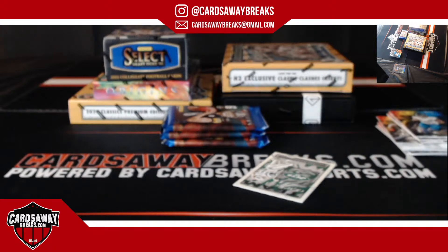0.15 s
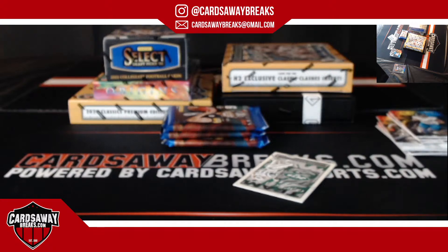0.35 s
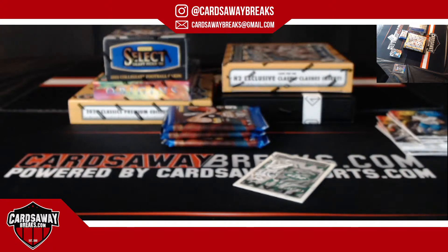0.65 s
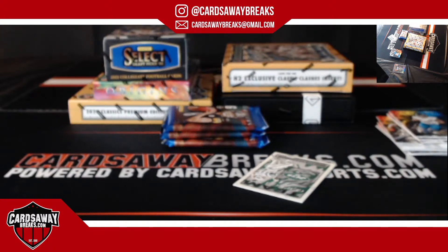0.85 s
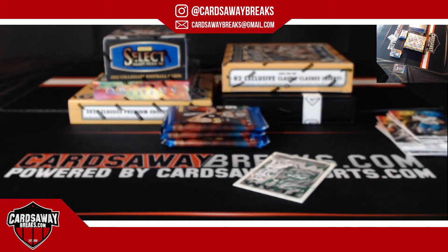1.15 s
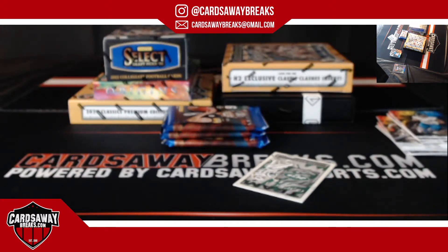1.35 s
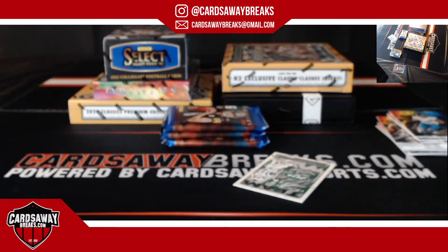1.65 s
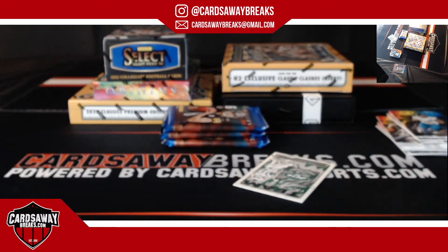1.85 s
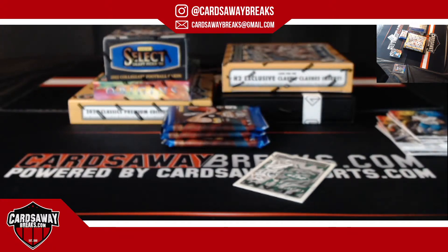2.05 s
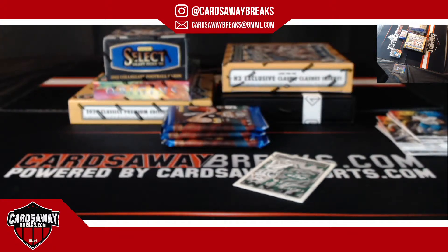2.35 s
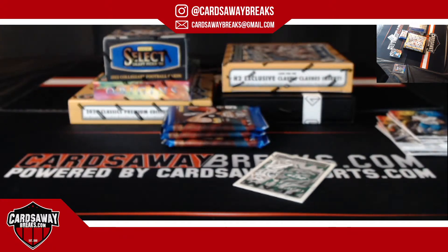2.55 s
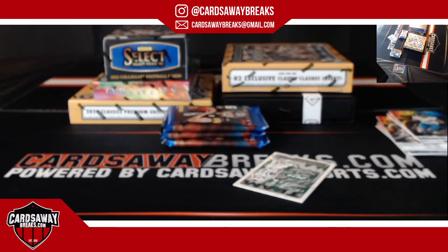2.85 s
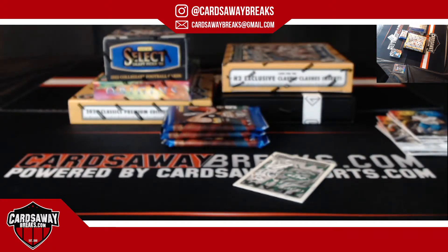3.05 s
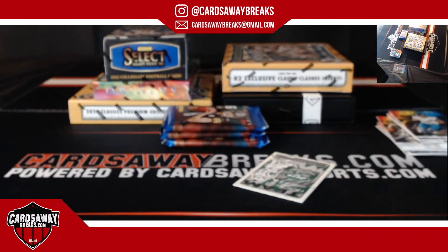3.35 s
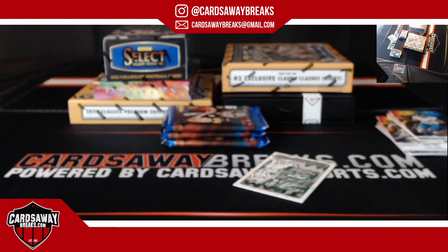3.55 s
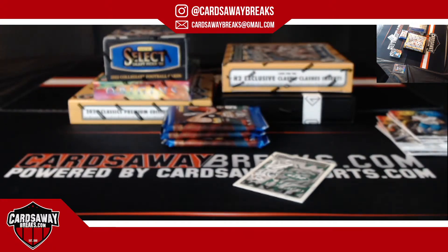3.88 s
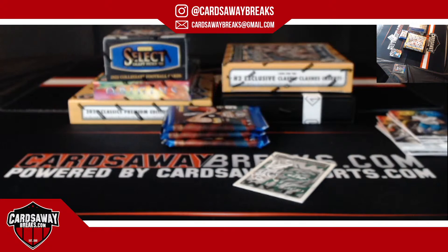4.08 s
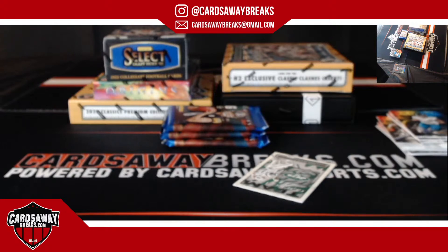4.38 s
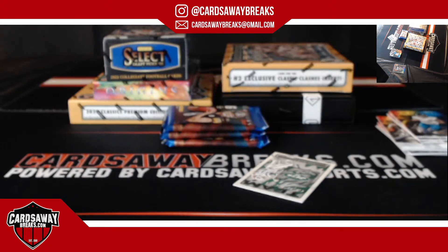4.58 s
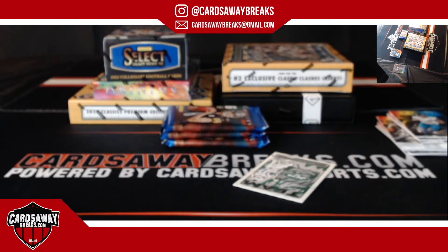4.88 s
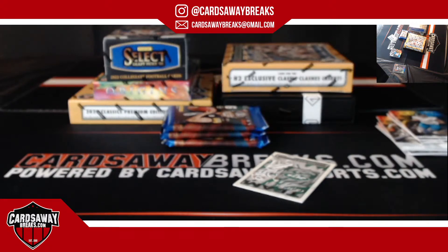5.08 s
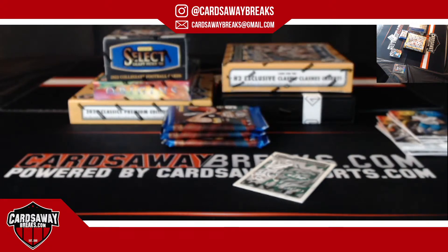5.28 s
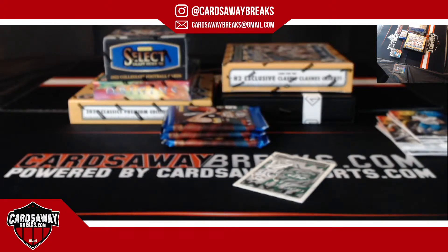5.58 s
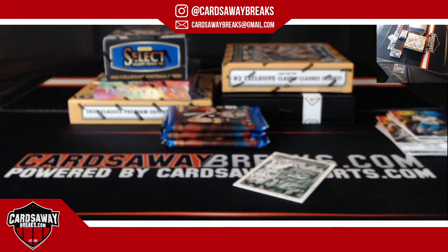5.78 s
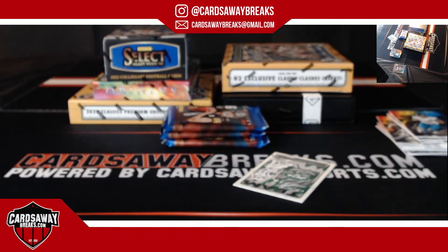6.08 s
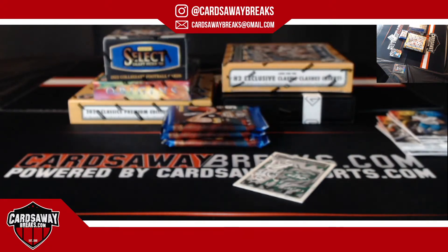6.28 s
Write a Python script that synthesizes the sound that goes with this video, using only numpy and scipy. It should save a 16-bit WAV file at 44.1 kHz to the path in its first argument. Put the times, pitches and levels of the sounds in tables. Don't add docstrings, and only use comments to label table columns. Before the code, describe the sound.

Close, dry tabletop sounds over a quiet low room hum. Faint plastic rubbing and small ticks come first, with a soft knock near half a second, then a short scraping pull of card from sleeve. Crisp snaps and clicks peak at 2.3 and 3.3 seconds, with thin rustling between. One hard flat slap, by far the loudest event, rings the table briefly late on, followed by a short creak and a muffled low bump.

```python
import sys
import numpy as np
from scipy import signal
from scipy.fft import rfft, irfft, next_fast_len
from scipy.io import wavfile
from scipy.ndimage import uniform_filter1d, map_coordinates

SR = 44100
rng = np.random.default_rng(int(sys.argv[2]) if len(sys.argv) > 2 else 0)


def wav_record(signal):
    frames = np.transpose(np.atleast_2d(signal))
    bounded = np.clip(frames, -1, 1)
    quanta = np.round(bounded * 32767).astype(np.int16)
    wavfile.write(sys.argv[1], SR, quanta)


def voltage_ratio(level):
    return 10 ** (np.asarray(level, float) / 20)


N = 283547


def unit(x):
    return x / np.sqrt(np.mean(x ** 2) + 1e-20)


def top(x):
    return x / np.abs(x).max()


def sine(hz, t):
    return np.sin(2 * np.pi * hz * t)


def along(points, hz):
    f, v = np.transpose(points)
    return np.interp(np.log(hz + 1), np.log(f + 1), v)


def wobble(rate_hz):
    knots = rng.standard_normal(int(N * rate_hz / SR) + 4)
    return map_coordinates(knots, [np.arange(N) * rate_hz / SR])


def filtered(x, response):
    m = next_fast_len(len(x) + 8192)
    return irfft(rfft(x, m) * response(np.fft.rfftfreq(m, 1 / SR)), m)[:len(x)]


def peak(f, hz, width_hz):
    return 1j * f * width_hz / (hz * hz - f * f + 1j * f * width_hz)


def band(f, lo_hz, hi_hz):
    rise = (1j * f / (lo_hz + 1j * f)) ** 2
    return rise / (1 - (f / hi_hz) ** 2 + 1.3j * f / hi_hz)


def gloss(f):
    return band(f, 6500, 12800) * peak(f, 11000, 7000) ** 2


def stroke_curves(rows, edge_s):
    t = np.arange(N) / SR
    gate = np.clip(np.minimum(t - rows[0][0], rows[-1][0] - t) / edge_s, 0, 1)
    s, *cols = np.transpose(rows)
    return gate, [np.interp(t, s, c) for c in cols]


def friction(grain_db, patchy_db):
    catches = rng.standard_normal(N) * voltage_ratio(grain_db * wobble(820))
    z = signal.stft(catches, nperseg=256)[2]
    field = uniform_filter1d(rng.standard_normal(z.shape), 5, 0)
    field = uniform_filter1d(field, 5, 1)
    return signal.istft(z * voltage_ratio(patchy_db * unit(field)), nperseg=256)[1][:N]


def decaying(t60_points, colour, seconds):
    hz, t, z = signal.stft(rng.standard_normal(round(seconds * SR)), SR, nperseg=256)
    decay = voltage_ratio(-60 * t / along(t60_points, hz)[:, None])
    return signal.istft(z * colour(hz)[:, None] * decay, SR, nperseg=256)[1]


def add(track, s, x):
    part = track[round(s * SR):][:len(x)]
    part += x[:len(part)]


# f/Hz, density/dB per Hz
AIR_COLOUR = [(11, -30.5), (18, 0), (97, -7), (148, -18.5), (166, -16.5), (203, -10.5), (320, -18),
              (519, -22.5), (599, -24.5), (1030, -32), (1670, -37.5), (1980, -36), (2160, -40.5),
              (2560, -39), (16300, -51.5)]
# f/Hz, level/dB
HUM_TONES = [(140.0, -79), (204.6, -82), (1001, -93), (1916, -102), (2003, -101), (4000, -106)]
AIR_DB = -65


def air():
    noise = unit(filtered(rng.standard_normal(N), lambda f: voltage_ratio(along(AIR_COLOUR, f))))
    rumble = filtered(noise, lambda f: 1 / (1 + (f / 300) ** 2))
    noise = noise + rumble * (voltage_ratio(1.0 * wobble(4.0) + 0.83 * wobble(0.37)) - 1)
    t = np.arange(N) / SR
    tones = np.zeros(N)
    for hz, db in HUM_TONES:
        level = voltage_ratio(db + 1 + 1.2 * wobble(5.6))
        tones += level * np.sin(2 * np.pi * hz * t + .8 * wobble(4.6))
    return voltage_ratio(AIR_DB) * noise + tones


# f/Hz, t60/s
ROOM_DECAY = [(200, .3), (1000, 0.32), (4000, 0.085), (12000, 0.14)]


def room(x):
    out, hop = np.zeros(N), SR // 3
    for start in range(0, N, hop):
        tail = decaying(ROOM_DECAY, np.ones_like, 0.41)
        tail = tail / np.linalg.norm(tail)
        add(out, start / SR + 0.0027, signal.fftconvolve(x[start:start + hop], tail))
    return out


# t/s, push level/dB, push f/Hz, panel ring level/dB
BUMP_EVENTS = [(.4778, -43, 113, -51.5), (.537, -53, 107, -61), (2.324, -49.5, 42, -74),
               (.4783, -58, 740, -90), (.5425, -55, 500, -90), (2.0375, -58, 540, -90),
               (1.9, -51, 750, -90), (5.3, -54, 600, -80), (3.3105, -51, 1000, -90), (.5145, -57, 710, -88),
               (2.7, -51.5, 600, -89.5), (2.201, -56, 590, -90), (2.8, -54.5, 680, -90),
               (3.261, -42, 520, -69), (4.681, -53, 51, -60.5), (6.21, -62, 85, -55),
               (6.274, -44.5, 54.8, -39.5), (6.304, -51, 37, -46.5)]


def bumps():
    out, t = np.zeros(N), np.arange(SR // 8) / SR
    panel = sine(215, t) + .25 * sine(410, t)
    for s, push_db, hz, ring_db in BUMP_EVENTS:
        push = sine(hz, t) * hz * t * np.exp(-2.6 * hz * t) * 7
        ring = voltage_ratio(ring_db - 60 * t / 0.07) * (1 - np.exp(-t / 0.0045)) * panel
        add(out, s, voltage_ratio(push_db) * push + ring)
    return out


# t/s, f/Hz, level/dB
SQUEAK_PATH = [(4.99, 14500, -100), (5.013, 13900, -94), (5.035, 14700, -92), (5.055, 14900, -91),
               (5.09, 14600, -93), (5.115, 14150, -96)]


def squeak():
    gate, (hz, db) = stroke_curves(SQUEAK_PATH, edge_s=0.011)
    level = voltage_ratio(db + 3 + 3.9 * wobble(60))
    return gate * level * np.sin(2 * np.pi * np.cumsum(hz + 60 * wobble(150)) / SR)


# t/s, pressure/dB
CREAK_PRESSURE = [
    (5.5, -92),
    (5.545, -80),
    (5.556, -67.5),
    (5.572, -83),
    (5.595, -64),
    (5.616, -72),
    (5.632, -68),
    (5.642, -80),
    (5.65, -90),
]
# f/Hz, width/Hz, level/dB
CREAK_MODES = [(5900, 960, 2), (8500, 1500, -7), (11640, 1200, -12)]
CREAK_TABLE_DB, TABLE_GROWS = -69.5, 0.081
SLIPS_PER_S = 140


def creak():
    gate, (plastic_db,) = stroke_curves(CREAK_PRESSURE, edge_s=0.0043)
    phase = np.cumsum(SLIPS_PER_S * voltage_ratio(1.7 * wobble(70))) / SR % 1
    table_slips = (.4 + np.exp(-7 * phase)) * rng.standard_normal(N)
    plastic_slips = (.35 + np.exp(-4 * phase)) * rng.standard_normal(N)

    def plastic_response(f):
        return sum(voltage_ratio(db) * peak(f, hz, width) for hz, width, db in CREAK_MODES) * band(f, 3500, 14000)

    table = unit(filtered(table_slips, lambda f: band(f, 350, 2700) * band(f, 200, 4260)))
    plastic = unit(filtered(plastic_slips, plastic_response))
    table_db = CREAK_TABLE_DB + TABLE_GROWS * (plastic_db + 72)
    return gate * (voltage_ratio(table_db) * table + voltage_ratio(plastic_db) * plastic)


# t/s, peak level/dB, ring f/Hz, sheen/dB
SNAP_EVENTS = [(0.528, -60, 5520, -22), (2.088, -57, 5890, -10), (2.0927, -47.5, 1500, -12),
               (2.2642, -54.5, 2260, -19), (3.2328, -68, 5750, -25), (3.3045, -50, 5800, -22),
               (3.5583, -53.5, 5650, -15), (4.633, -61, 4550, 3), (4.853, -59, 3000, -22),
               (5.0389, -57, 3800, -31), (5.7815, -61, 4620, -23)]
# t/s, peak level/dB, ring f/Hz
FLEX_EVENTS = [(3.254, -45, 6600), (3.2603, -38.5, 5100), (3.3111, -43, 4530), (5.5204, -56.5, 2980)]
# t/s, peak level/dB, ring f/Hz
TICK_EVENTS = [(0.1434, -65, 2000), (.4453, -64, 5860), (.4715, -58, 4500), (.4885, -62, 3700),
               (.509, -56, 5000), (.521, -71, 5500), (0.7646, -69, 9150), (0.777, -74, 2450),
               (2.0284, -71, 2390), (2.029, -66, 9500), (2.277, -64.5, 9000), (2.4631, -72, 3140),
               (2.47, -71, 3170), (2.557, -60, 10000), (2.6114, -65, 2320), (3.181, -66, 5640),
               (3.442, -71, 6140), (4.45, -67, 3000), (4.5844, -67, 2200), (4.6156, -58, 3350),
               (4.7504, -60.5, 3140), (4.867, -64, 6100), (5.15, -62, 2740), (5.1653, -71, 2080),
               (5.207, -67, 9000), (6.135, -69, 3294), (6.346, -64, 7800)]
EDGE_MS, SHEEN_MS = 0.7, 0.21
TICK_SHEEN_DB, FLEX_SHEEN_DB = -12, -14.5
BODY_DB, BODY_GROWS, FLEX_BODY_DB = -69, 0.45, 9


def ticks():
    out, t = np.zeros(N), np.arange(1024) / SR
    u = t * 1000 / np.array([[EDGE_MS], [SHEEN_MS], [EDGE_MS]])
    edges = [(*row, 0) for row in SNAP_EVENTS]
    edges += [(*row, FLEX_SHEEN_DB, FLEX_BODY_DB) for row in FLEX_EVENTS]
    edges += [(*row, TICK_SHEEN_DB, 0) for row in TICK_EVENTS]
    for s, db, hz, sheen_db, stiff_db in edges:
        bursts = u * np.exp(-u) * rng.standard_normal((3, len(t)))
        ring = filtered(bursts[0], lambda f: (peak(f, hz, 0.22 * hz) + 0.34) * band(f, 850, 7000))
        sheen = filtered(bursts[1], gloss)
        body = filtered(bursts[2], lambda f: band(f, 280, 800))
        body_db = BODY_DB + BODY_GROWS * (db + 67.5) + stiff_db
        edge = voltage_ratio(db) * (top(ring) + voltage_ratio(sheen_db) * top(sheen))
        add(out, s, edge + voltage_ratio(body_db) * top(body))
    return out


# t/s, peak level/dB, low f/Hz, middle f/Hz, high f/Hz
CLICK_EVENTS = [(.4785, -49, 900, 2900, 4600), (0.5143, -46.5, 1000, 3660, 6400),
                (0.5428, -48, 1500, 3000, 4700), (1.7735, -42, 3400, 4600, 7000),
                (1.786, -43, 1400, 3440, 4600), (1.7915, -44, 2200, 3300, 4600),
                (1.8272, -50.5, 1640, 2400, 5500), (1.9685, -56, 2750, 5470, 8820),
                (1.9712, -48.5, 2750, 5470, 9500), (1.9737, -55, 3100, 5800, 8820),
                (2.0382, -57.5, 1700, 2600, 9000), (2.099, -36, 2100, 5700, 7400),
                (2.159, -44, 3900, 5410, 8810), (2.1604, -28, 3800, 5480, 9000),
                (2.1614, -33, 1500, 8700, 11570), (2.2008, -38.5, 3050, 5200, 9000),
                (2.3226, -28.5, 3960, 6360, 9000), (2.3243, -30, 3900, 6800, 11500),
                (2.3262, -22.5, 4590, 6790, 11400), (2.3285, -27, 3020, 6800, 9700),
                (2.331, -30, 2280, 5900, 12000), (2.3327, -34, 1500, 4000, 9700),
                (2.5223, -43.5, 1500, 3250, 9220), (2.5233, -38.5, 3270, 5850, 9100),
                (3.2438, -49, 3400, 6200, 7300), (3.2478, -48, 3200, 6100, 7300),
                (3.2574, -29, 5070, 6330, 7540), (3.2583, -35, 1370, 3000, 6930),
                (3.3072, -41, 3540, 4620, 6310), (3.309, -33, 3540, 6310, 8500),
                (4.1545, -55, 3300, 3820, 9000), (4.162, -52, 1490, 3730, 5150),
                (4.1763, -55, 3500, 5100, 10500), (6.2768, -57, 600, 1200, 2000),
                (6.339, -54.5, 3000, 5100, 8700)]
CLICK_LOW_DB, CLICK_HIGH_DB, CLICK_GAIN_DB = -2, -4, 1.5
CLICK_WIDTH_HZ, CLICK_FUZZ, CLICK_MS = 440, 0.37, .9


def clicks():
    out, u = np.zeros(N), np.arange(1024) * 1000 / SR / CLICK_MS
    for s, db, low_hz, mid_hz, high_hz in CLICK_EVENTS:
        release = (u == 0) + CLICK_FUZZ * np.exp(-u) * rng.standard_normal(len(u))

        def edge(f):
            low = voltage_ratio(CLICK_LOW_DB) * peak(f, low_hz, .7 * CLICK_WIDTH_HZ)
            middle = peak(f, mid_hz, CLICK_WIDTH_HZ)
            high = voltage_ratio(CLICK_HIGH_DB) * peak(f, high_hz, 1.3 * CLICK_WIDTH_HZ)
            return (low - middle + high + .13) * band(f, 0.4 * low_hz, 13000)

        add(out, s, voltage_ratio(db + CLICK_GAIN_DB) * top(filtered(release, edge)))
    return out


# t/s, level/dB, pocket f/Hz, rim f/Hz
PULL_PATH = [
    (1.725, -77, 3700, 4660),
    (1.748, -66.5, 3800, 4630),
    (1.77, -52.5, 3680, 4600),
    (1.788, -50.5, 3440, 4550),
    (1.8, -54.5, 2110, 4660),
    (1.82, -58.5, 2000, 4750),
    (1.835, -58, 1600, 5500),
    (1.86, -66.5, 1370, 5160),
    (1.89, -86, 1250, 4700),
]
PULL_SHEEN_DB, SHEEN_GROWS = -66.5, 0.56
FLAP_HZ, PULL_GRAIN_DB = 1380, 2.4


def pull():
    gate, (level_db, pocket_hz, rim_hz) = stroke_curves(PULL_PATH, edge_s=0.0061)
    hz, t, z = signal.stft(friction(PULL_GRAIN_DB, 3.6), SR, nperseg=256)
    hz = hz[:, None]
    at = np.minimum((t * SR).astype(int), N - 1)

    def ringing(centre_hz, share):
        return np.abs(peak(hz, centre_hz, share * centre_hz)) ** 2

    shape = ringing(pocket_hz[at], 0.16) + 0.76 * ringing(rim_hz[at], 0.08)
    shape = shape + 0.26 * ringing(FLAP_HZ, 0.17) + 0.25 * np.abs(band(hz, 1300, 7700))
    pocket = unit(signal.istft(z * shape, SR, nperseg=256)[1][:N])
    sheen = unit(filtered(friction(3.1, 3.3), gloss))
    sheen_db = PULL_SHEEN_DB + SHEEN_GROWS * (level_db + 57)
    return gate * (voltage_ratio(level_db) * pocket + voltage_ratio(sheen_db) * sheen)


# start t/s, length/ms, rub level/dB, rub f/Hz, sheen/dB
DRAG_STROKES = [(.04, 136, -81.5, 5500, 0.5), (.367, 25, -83, 7500, 0), (1.38, 165, -93, 5000, 9.5),
                (2.205, 56, -69, 4500, -4), (2.488, 36, -63, 4000, -4), (2.51, 20, -61, 3300, -14),
                (3.167, 21, -72.5, 5800, -25.5), (3.908, 68, -69, 5500, -17), (4.243, 72, -68.5, 4700, -1),
                (4.27, 46, -64.5, 2210, -21), (4.355, 16, -75, 2900, -22.5), (4.702, 51, -71.5, 2980, -10),
                (5.03, 15, -66.5, 2960, -24), (5.29, 48, -88, 7010, 3)]
BRUSH_STROKES = [(.162, 28, -80, 6000, 12), (.203, 49, -77.5, 7500, -1), (.28, 74, -87.5, 4000, 2),
                 (.47, 94, -72.5, 1180, -30), (.76, 180, -82, 4500, 3), (1.959, 24, -66, 5100, -13),
                 (1.958, 27, -70, 2740, -30), (2.11, 150, -71, 4200, 2.5), (2.153, 17, -53, 5400, -5.5),
                 (2.322, 14, -39.5, 4900, -1), (2.62, 66, -83, 5560, -4), (3.055, 105, -71.5, 3220, -13),
                 (3.538, 42, -70.5, 4500, -12), (4.014, 55, -65, 3660, 2), (4.439, 37, -75, 3000, -7),
                 (4.542, 39, -68.5, 3480, -2), (4.879, 60, -72.5, 6500, -5), (5.138, 31, -72.5, 3840, -6),
                 (6.19, 45, -71.5, 502, -30)]
SETTLE_STROKES = [(.438, 140, -71.5, 3780, -15), (1.51, 350, -80.5, 4600, 11.5),
                  (2.2575, 6.2, -53, 5470, -12.5), (2.524, 35, -73, 3300, -5), (2.265, 75, -80, 5990, -0.5),
                  (2.33, 250, -77, 5400, -5), (3.25, 92, -65, 4800, -11), (3.297, 62, -63.5, 4540, -6),
                  (3.35, 120, -67.5, 5570, -3.5), (3.355, 120, -73, 1100, -30), (3.615, 75, -62, 6400, -6),
                  (3.736, 50, -70, 5440, 2), (3.77, 140, -79.5, 5500, -2), (4.15, 38, -69.5, 3600, -13),
                  (4.357, 94, -66, 4450, 0), (4.62, 120, -76, 4000, -8), (4.84, 530, -81, 3500, -6.5),
                  (5.42, 120, -69, 4370, -22), (6.051, 510, -83, 3000, -9), (6.271, 53, -61, 500, -32),
                  (6.286, 97, -75.5, 4420, -14)]
DRAG_RISE, BRUSH_RISE, SETTLE_RISE = 0.69, 0.421, 0.17
STROKE_CURVE, RUB_GRAIN_DB = 1.05, 2.5
SHINE_RISES = .1


def slides():
    out, rough, fine = np.zeros(N), friction(RUB_GRAIN_DB, 2.2), friction(3.4, 2.2)
    kinds = [(DRAG_STROKES, DRAG_RISE), (BRUSH_STROKES, BRUSH_RISE), (SETTLE_STROKES, SETTLE_RISE)]
    for rows, rise in kinds:
        for start, length_ms, db, hz, sheen_db in rows:
            u = np.arange(0, length_ms, 1000 / SR) / length_ms
            stroke = np.clip(np.minimum(u / rise, (1 - u) / (1 - rise)), 0, 1) ** STROKE_CURVE
            at = np.minimum(round(start * SR) + np.arange(len(u)), N - 1)

            def rub_response(f):
                return peak(f, hz, 1.1 * hz) ** 2 - 0.47 * band(f, .16 * hz, 0.76 * hz)

            rub = unit(filtered(rough[at], rub_response))
            sheen = unit(filtered(fine[at], lambda f: gloss(f / voltage_ratio(SHINE_RISES * sheen_db))))
            add(out, start, voltage_ratio(db) * stroke * (rub + voltage_ratio(sheen_db) * sheen))
    return out


SWELL_CYCLES = 1.4


def ringing_modes(modes, t):
    waver = uniform_filter1d(rng.standard_normal((len(modes), len(t))), size=700, axis=1)
    out = np.zeros(len(t))
    for k, (hz, db, t60) in enumerate(modes):
        level = voltage_ratio(db - 60 * t / t60 + 3.3 * unit(waver[k]))
        swell = 1 - np.exp(-hz * t / SWELL_CYCLES)
        out += level * swell * np.sin(2 * np.pi * hz * t + k * k)
    return out


# t/s, peak level/dB, sheen/dB
SLAP_HITS = [
    (5.337, -8.5, -26),
    (5.3408, -12.5, -12.5),
]
# f/Hz, level/dB, t60/s
HOLDER_MODES = [(1147, -5, .15), (1254, -2.5, .16), (1357, 4.5, 0.1), (1507, -9, .22), (1710, -11.5, .17),
                (1910, -9, .14), (2120, -9, .12), (2470, -3, .085), (2589, -5, .08), (2853, -2, .11),
                (3060, -3, 0.083), (3200, -8, .14), (4600, -14, 0.14), (5400, -16, .1)]
# f/Hz, level/dB, t60/s
TABLE_MODES = [(170.2, -12.5, .3), (212.7, 0, .14), (301, -4, .18), (334.4, -0.5, .22), (405.7, 0, 0.17),
               (502, -10, 0.27), (573, -2, .2), (677, -2.5, .18), (845, -1, 0.15), (889, -12, 0.15),
               (987, -4, .13), (1066, -10, .2)]
# f/Hz, density/dB per Hz
WASH_COLOUR = [(29, -37), (50, -10.5), (337, -1.5), (1180, -9.5), (1330, -6), (2270, -14), (2490, -11),
               (2880, -7), (4240, -20), (4560, -15), (7760, -29.5), (13800, -43.5), (16000, -45.5)]
# f/Hz, t60/s
WASH_DECAY = [(60, .35), (140, 0.65), (250, 0.17), (500, 0.28), (1100, 0.26), (3000, 0.22), (6000, .24),
              (10000, 0.27), (15000, .15)]
TABLE_DB, HOLDER_DB = -28, -30
BOOM_HZ, BOOM_T60_S = 133, .3
SHAKE_HZ, SHAKE_T60_S = 58, 0.61


def slap_wash(t):
    wash = decaying(WASH_DECAY, lambda f: voltage_ratio(along(WASH_COLOUR, f)), .6)[:len(t)]
    wash = filtered(wash, lambda f: 1 / (1 + 1.2 * 115 / (1j * f + 1) - (115 / (f + 1)) ** 2) ** 2)
    wash = top(wash) * (1 - np.exp(-t / 0.00055)) * (0.63 + .5 * np.exp(-t / 0.024))
    lows = filtered(wash, lambda f: 1 / (1 + (f / 450) ** 4))
    return wash - np.exp(-t / 0.0081) * lows


def slap():
    out, t = np.zeros(N), np.arange(SR // 2) / SR
    rings = voltage_ratio(TABLE_DB) * ringing_modes(TABLE_MODES, t) + voltage_ratio(HOLDER_DB) * ringing_modes(HOLDER_MODES, t)
    add(out, SLAP_HITS[0][0] + .0004, rings)
    for s, db, sheen_db in SLAP_HITS:

        def crack_response(f):
            return band(f, 700, 3900) + 0.31 * peak(f, 5100, 2300) + voltage_ratio(sheen_db) * band(f, 9000, 12520)

        crack = filtered(voltage_ratio(-60 * t / 0.017) * rng.standard_normal(len(t)), crack_response)
        boom = voltage_ratio(-60 * t / BOOM_T60_S) * (1 - np.exp(-t / 0.011)) * sine(BOOM_HZ, t)
        add(out, s + .0004, voltage_ratio(db) * (0.69 * crack + 0.49 * slap_wash(t) + 0.26 * boom))
    out = filtered(out, lambda f: (1j * f / (70 + 1j * f)) ** 2)
    shake = voltage_ratio(-60 * t / SHAKE_T60_S) * (1 - np.exp(-t / .02)) * sine(SHAKE_HZ, t)
    add(out, SLAP_HITS[0][0], voltage_ratio(-43.5) * shake)
    return out


def scene():
    hands = squeak() + creak() + ticks() + clicks() + pull() + slides()
    return (air() + voltage_ratio(-17.5) * room(hands) + bumps() + hands + slap())[None]


def roll_off(x):
    return signal.sosfilt(signal.butter(12, 15950, fs=SR, output="sos"), x)


TOP_HZ = 15850


def record(dry):
    mix = filtered(dry[0], lambda f: 1 / np.sqrt(1 + (f / TOP_HZ) ** 90))[None]
    return roll_off(mix)


dry = scene()
out = record(dry)
wav_record(out)
```